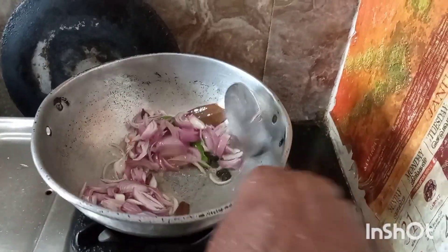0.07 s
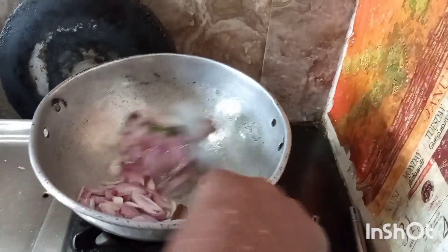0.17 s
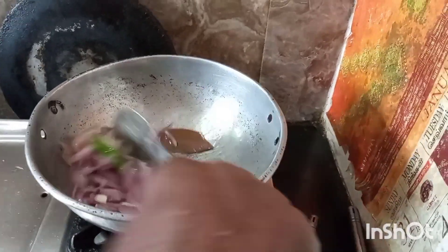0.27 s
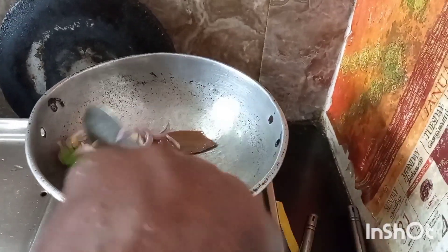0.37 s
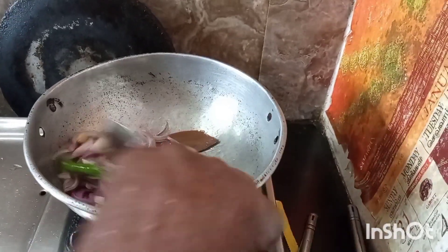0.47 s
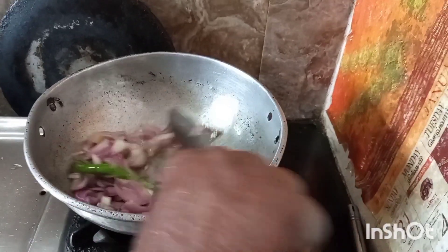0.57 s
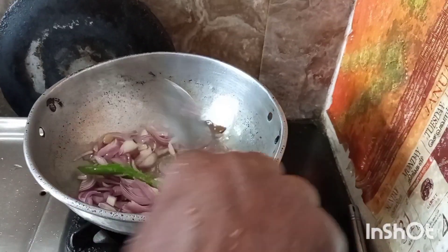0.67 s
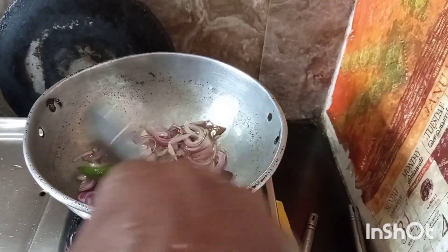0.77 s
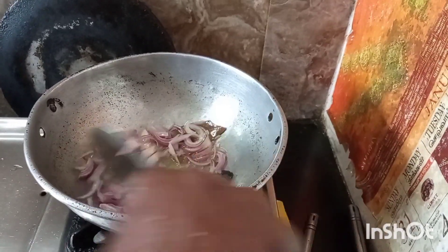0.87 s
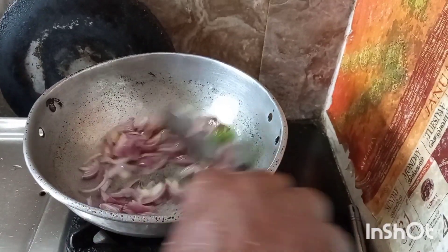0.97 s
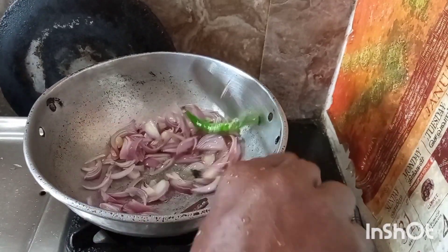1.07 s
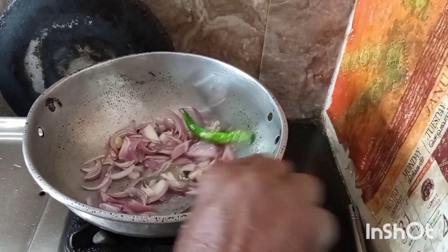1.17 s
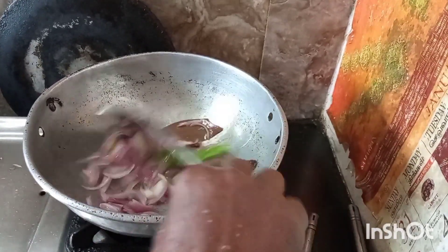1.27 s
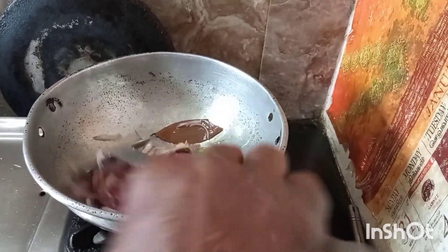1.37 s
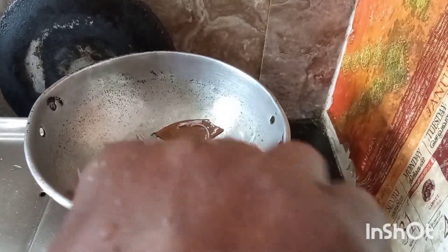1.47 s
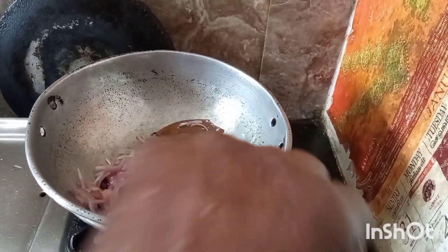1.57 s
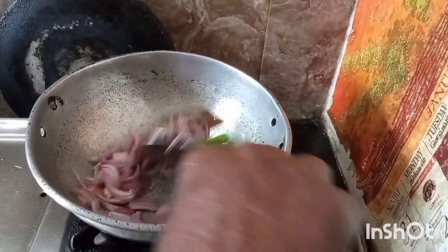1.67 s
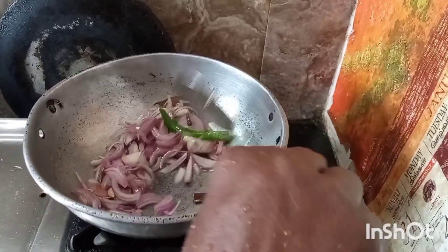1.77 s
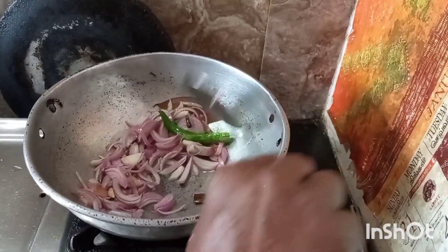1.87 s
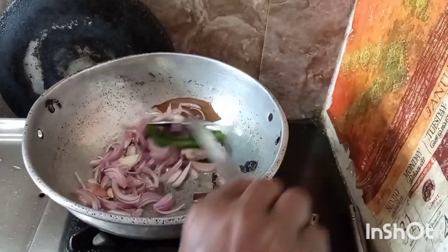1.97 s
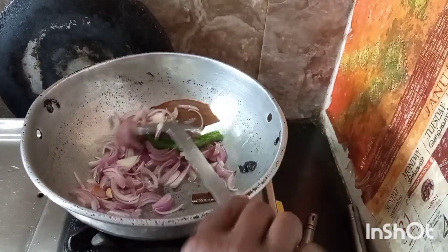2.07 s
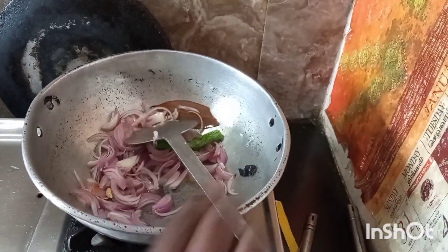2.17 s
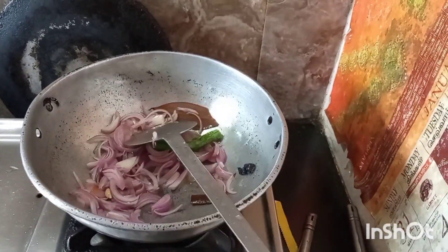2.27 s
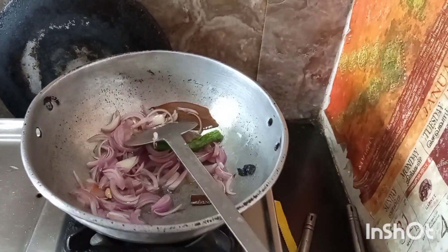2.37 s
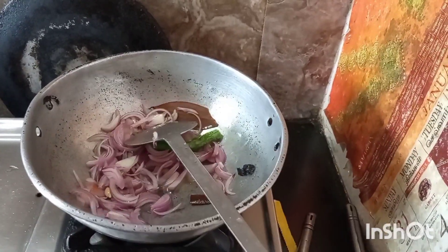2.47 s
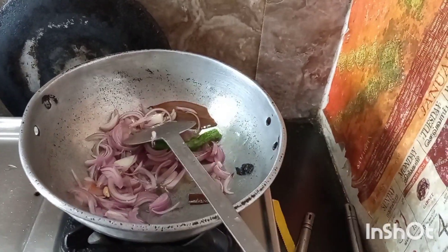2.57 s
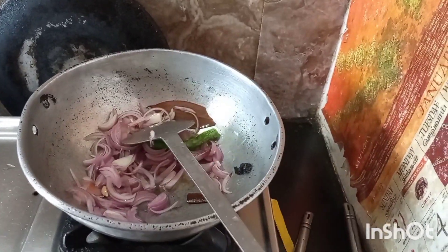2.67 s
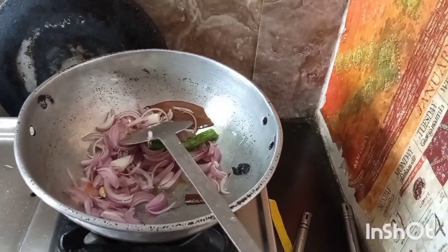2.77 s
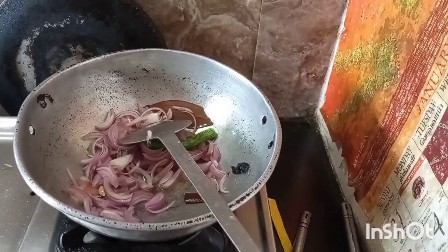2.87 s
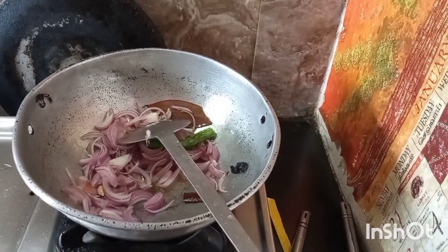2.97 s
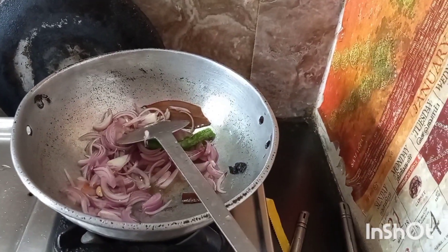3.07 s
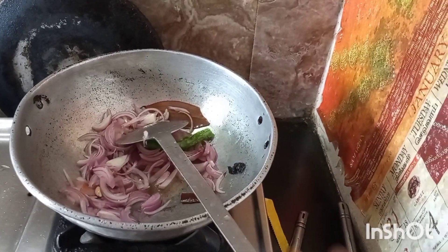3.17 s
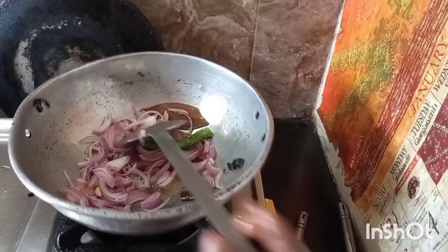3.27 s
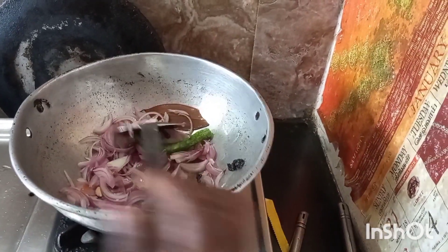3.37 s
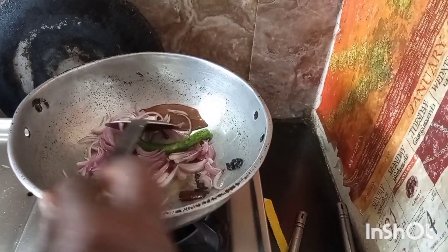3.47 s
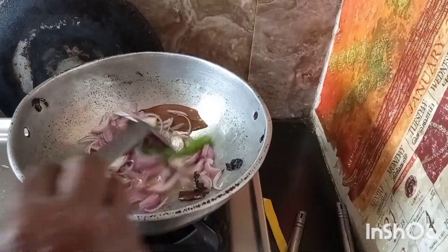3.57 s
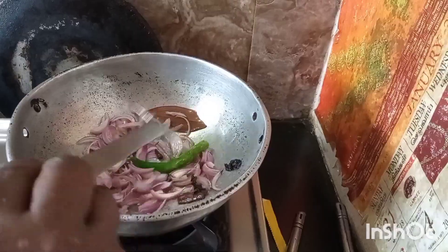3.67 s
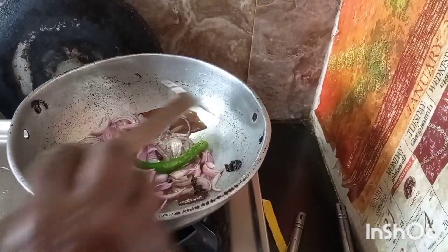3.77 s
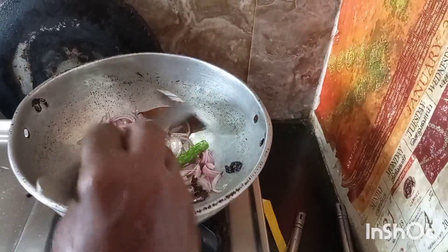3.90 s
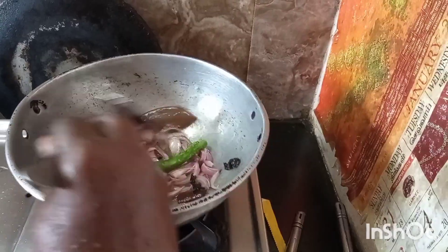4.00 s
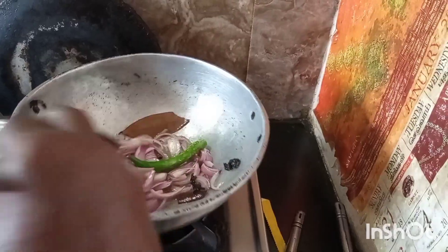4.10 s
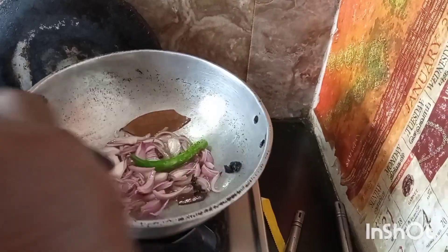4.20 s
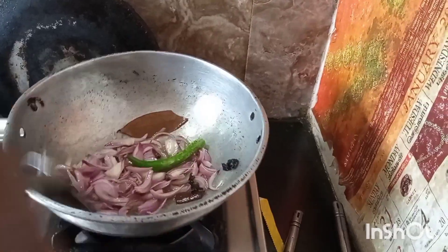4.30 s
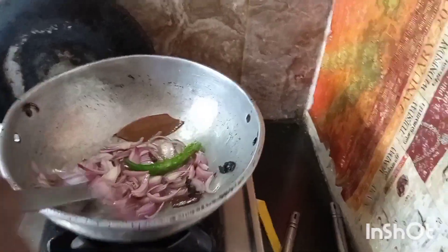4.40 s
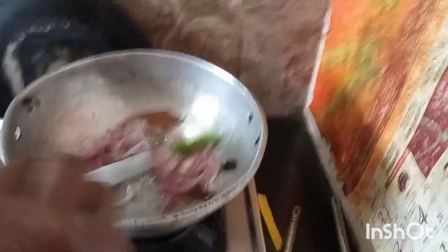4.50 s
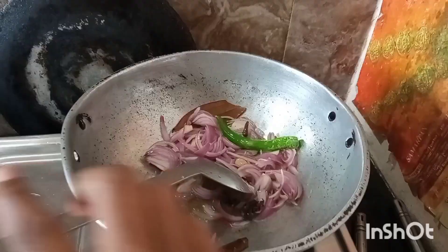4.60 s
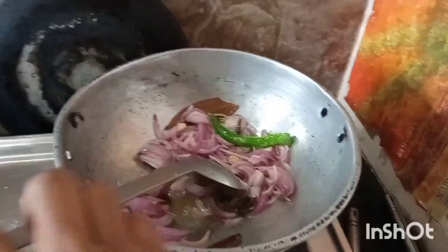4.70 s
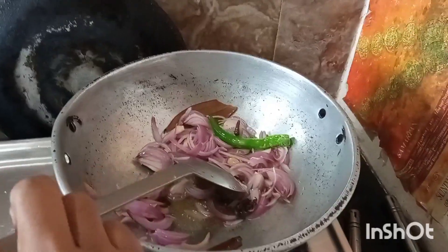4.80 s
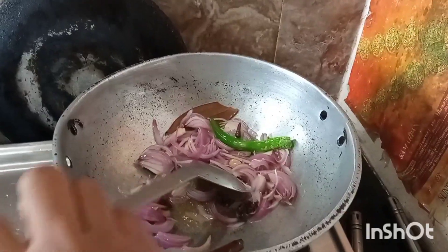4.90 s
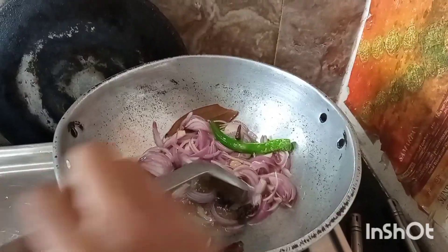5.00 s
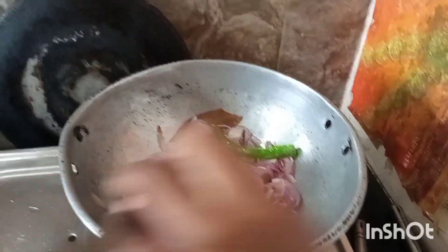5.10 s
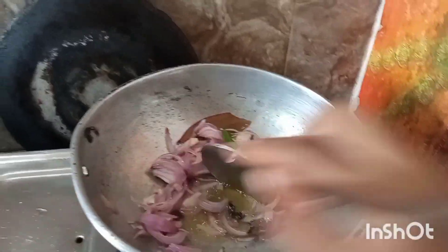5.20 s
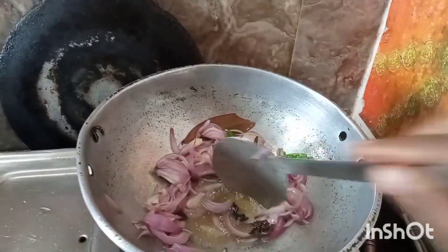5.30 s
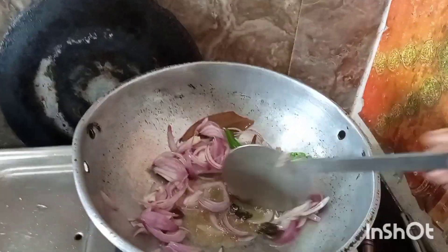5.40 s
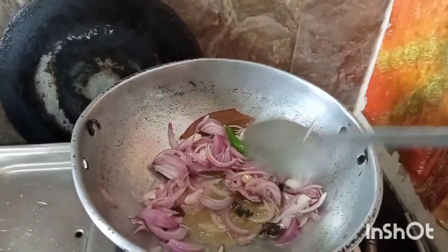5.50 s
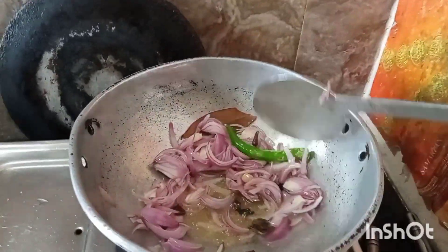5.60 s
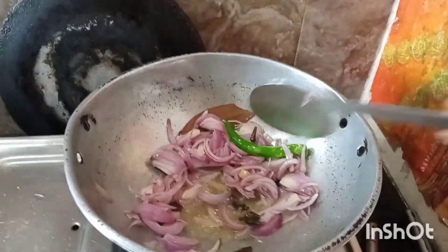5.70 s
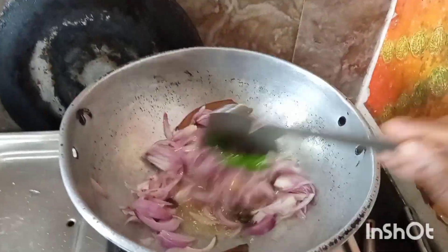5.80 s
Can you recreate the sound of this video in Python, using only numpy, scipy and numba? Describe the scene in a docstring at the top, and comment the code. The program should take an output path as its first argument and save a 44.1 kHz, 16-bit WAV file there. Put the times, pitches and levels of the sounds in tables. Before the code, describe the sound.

Sliced onions fry with a dense bright sizzle while a steel spatula knocks and scrapes a thin metal pan, with one brief cut near the end.

```python
"""Dense frying fizz runs throughout both passages, with steel knocking and scraping on a thin pan close by.
Sliced onions fry in oil: steam bubbles burst as filtered grains over hiss, the larger ones as lone pops.
A spatula's blows and stick-slip drive resonant modes of pan and blade; the pan rocks on the stove grate.
An edit joins two passages: the first stops, a short near-silence follows, then the second fades in."""
import sys
import numpy as np
from scipy import signal
from scipy.fft import rfft, irfft
from scipy.io import wavfile
from scipy.ndimage import uniform_filter1d
from numba import njit

SR = 44100
rng = np.random.default_rng(int(sys.argv[2]) if len(sys.argv) > 2 else 0)


def waveform_to_disk(signal):
    """Save audio, clipped to [-1, 1], as 16-bit WAV at the path in sys.argv[1]."""
    frames = np.transpose(np.atleast_2d(signal))
    scaled = np.clip(frames, -1, 1) * 32767
    samples = np.round(scaled).astype(np.int16)
    wavfile.write(sys.argv[1], SR, samples)


N = 257984

# fizz before the extra from stirring, one list for each passage: (time [s], level [dB])
FIZZ_LEVELS = [
    [(0, -30), (.69, -30.5), (1.08, -32), (1.52, -32), (2.3, -35.5), (2.86, -36), (3.3, -35.5), (3.8, -36),
     (4.0, -34), (4.3, -36), (4.51, -32.5)],
    [(4.86, -34.5), (5.1, -33), (5.4, -33.5), (5.85, -32)],
]
# mean spectrum of the fizz: (frequency [Hz], relative density [dB per Hz])
FIZZ_SPECTRUM = [(100, -36), (600, -19), (1200, -13), (2000, -8.5), (3500, -2.5), (5000, -3.5), (6500, -1),
                 (7300, -6.5), (8200, -12), (9700, -4.5), (11000, -13), (13800, -22.5), (14600, -14.5),
                 (15600, -8.5)]
# lone bubbles and spits of oil: (time [s], relative level [dB], pitch [Hz])
LONE_POPS = [(0.0296, -20.5, 6230), (0.061, -19.5, 6850), (0.1385, -26, 4150), (0.3475, -25, 3700),
             (0.4945, -22, 4050), (0.5878, -19, 6630), (0.8202, -25, 3400), (1.268, -28, 6000),
             (1.6483, -26, 4300), (2.2004, -21, 4200), (2.3377, -27, 3430), (2.4941, -23.5, 3640),
             (2.689, -26.5, 3700), (2.8385, -27, 4600), (2.8635, -27, 6750), (2.9634, -26, 4970),
             (3.0488, -30, 6220), (3.078, -23, 4930), (3.18, -26, 6200), (3.2682, -25, 3600),
             (3.387, -26, 5900), (3.522, -20.5, 6400), (3.6726, -22.5, 9000), (4.112, -23, 6640),
             (4.419, -19, 6400), (4.609, -25, 1650), (4.6688, -28, 2460), (4.789, -30, 6700),
             (4.9284, -21.5, 6200), (5.07, -26.5, 3600), (5.1244, -27, 6630), (5.251, -29, 3150),
             (5.126, -32, 1780), (5.3132, -25, 2250), (5.389, -25, 3650), (5.471, -25, 6170),
             (5.494, -21, 6900), (5.6193, -32, 3500), (5.6375, -22.5, 3640), (5.6997, -23, 3620)]
# spatula dragged over the metal, starting at once: (start [s], end [s], first relative level [dB],
# last relative level [dB], centre of the pan's ring [Hz], bare steel edge relative to the drag [dB])
SCRAPES = [(0, 0.078, -33.5, -31.5, 408, -14), (0.085, 0.25, -26, -53.5, 423, -9),
           (0.243, 0.33, -34.5, -28, 335, -9), (0.367, 0.45, -37, -44, 336, 0),
           (0.458, 0.563, -39.5, -38, 590, 3), (0.571, 0.719, -38.5, -48, 464, 0),
           (0.739, 1.055, -45, -52, 580, 6.5), (1.077, 1.316, -54, -53, 800, -6),
           (1.543, 1.64, -32, -35.5, 440, -27), (1.667, 1.758, -41, -49, 330, -12),
           (1.771, 1.894, -35, -31.5, 460, -8), (1.909, 2.062, -36.5, -36, 425, -4),
           (2.082, 2.133, -27.5, -37.5, 720, 3), (2.148, 2.198, -34.5, -38, 600, 2.5),
           (2.194, 2.262, -27, -33.5, 407, -2), (2.279, 2.347, -43, -49, 450, -2),
           (2.38, 2.46, -33, -44.5, 400, -0.5), (2.476, 2.704, -37, -54.5, 390, -2.5),
           (2.923, 3.004, -48.5, -58, 480, -15), (3.176, 3.28, -48, -73, 350, -4),
           (3.303, 3.395, -24.5, -42, 460, -8), (3.396, 3.518, -30, -40, 570, -7),
           (3.535, 3.751, -32.5, -53.5, 463, -26), (3.877, 3.993, -24.5, -37.5, 480, -8.5),
           (4.013, 4.147, -28.5, -38, 564, -25), (4.137, 4.215, -24.5, -41.5, 885, -7),
           (4.216, 4.325, -30, -41, 487, -15), (4.356, 4.412, -29.5, -29.5, 580, -2),
           (4.416, 4.533, -26.5, -21.5, 710, -16.5), (4.86, 5.044, -44, -58.5, 378, -24.5),
           (5.148, 5.284, -46.5, -40.5, 487, -3), (5.283, 5.426, -47, -50, 400, 10.5),
           (5.553, 5.637, -46.5, -59, 350, 6), (5.67, 5.785, -33, -35, 420, -12),
           (5.818, 5.852, -22.5, -36, 450, -19)]
# spatula knocks: (time [s], relative level [dB], centre of the pan's ring [Hz], relative crack level [dB])
SPATULA_KNOCKS = [(0.004, -28, 244, -38), (0.032, -28, 398, -30), (0.087, -26.5, 457, -37),
                  (0.26, -31.5, 236, -31), (0.322, -24, 318, -28), (0.463, -33, 455, -40),
                  (0.504, -26.5, 690, -29), (0.745, -52, 764, -26.5), (1.535, -31, 248, -30),
                  (1.567, -25.5, 340, -34), (1.778, -25, 216, -38), (1.839, -22.5, 740, -29),
                  (1.938, -36, 291, -41), (1.977, -32, 307, -42), (2.086, -29, 460, -48),
                  (2.198, -40, 500, -35), (2.224, -36, 314, -42), (2.362, -31.5, 680, -30.5),
                  (2.389, -28, 277, -45), (2.484, -42, 680, -37), (2.52, -38, 310, -33),
                  (3.234, -43, 727, -27), (3.291, -23, 216, -30), (3.336, -31, 264, -41),
                  (3.405, -23, 770, -26), (3.471, -25.5, 242, -41), (3.529, -25.5, 666, -40),
                  (3.599, -33, 696, -46), (3.869, -17, 312, -42), (3.896, -22.5, 710, -22),
                  (4.006, -27.5, 230, -45), (4.037, -25.5, 650, -45), (4.059, -25.5, 630, -33),
                  (4.138, -23, 1330, -22), (4.163, -51, 1350, -22.5), (4.351, -35, 315, -18),
                  (4.439, -23, 676, -30), (4.863, -38.5, 283, -26), (5.289, -35.5, 324, -31),
                  (5.365, -36.5, 275, -28), (5.415, -41, 283, -36), (5.673, -35, 280, -31),
                  (5.723, -24.5, 290, -35), (5.817, -32, 294, -44)]
# the pan bumps the grate and rocks on:
# (time [s], relative bump level [dB], relative rocking level [dB], centre of the ring [Hz])
GRATE_BUMPS = [(0.037, -44, -50, 130), (0.297, -38, -65, 120), (0.491, -62, -44, 181),
               (1.534, -43, -63, 140), (1.836, -43, -44.5, 121), (2.388, -44.5, -69, 130),
               (3.168, -34.5, -41, 127), (3.772, -34.5, -42, 140), (3.873, -40, -46, 120),
               (4.351, -52.5, -61, 119), (4.958, -38, -50, 111), (5.266, -59, -45.5, 162),
               (5.553, -36, -45, 147)]
# modes of the pan, damped by oil and onions: (frequency [Hz], relative level [dB], T60 [s])
PAN_MODES = [(209.3, -1.5, 0.1), (246, -3.5, 0.19), (283.6, 4, 0.097), (311, 2, 0.18), (415, -1, 0.14),
             (466.2, -1.5, 0.14), (503, -2.5, 0.16), (550, -11, 0.095), (675.4, 3, 0.095),
             (719.3, 1.5, 0.17), (783, -9, 0.088), (813, 2, 0.084), (901, -0.5, 0.075), (972, -2, 0.079),
             (1060, -8, 0.042), (1160, -1.5, 0.072), (1212, -8.5, 0.16), (1366, 4, 0.054),
             (1497, -6.5, 0.17), (1550, -23, 0.08)]
# modes of the spatula's steel blade: (frequency [Hz], relative level [dB], T60 [s])
BLADE_MODES = [(1955, 3, 0.059), (2112, -2, 0.097), (2303, 4, 0.061), (2410, -3, 0.051), (2650, 4.5, 0.059),
               (3180, -27, 0.05), (3248, 6, 0.077), (3640, 8.5, 0.029), (4040, 6, 0.022),
               (4460, 3.5, 0.077)]
# low modes of the stove grate: (frequency [Hz], relative level [dB], T60 [s])
GRATE_MODES = [(101, 0.5, 0.17), (118.7, 3.5, 0.53), (168.5, 5, 0.33), (230, 2, 0.051)]

CUT_S, RESUME_S, FADE_S = 4.517, 4.584, 0.24  # first passage stops, second begins, its fade-in time
MIC_LOW_HZ, TOP_HZ = 86.5, 15500  # band limits
ROCK_S, PUSH_S = 0.13, 0.069  # rocking dies away; the heavy pan follows the drag sluggishly
STIR_DB, STIR_S = 12, 0.0067  # stirring turns wet onion into the oil: extra fizz follows the drag


def undb(db):
    """Decibel law: level to amplitude ratio."""
    return 10 ** (np.asarray(db) / 20)


def unit(x):
    """Normalisation to an rms of 1."""
    return x / np.sqrt(np.mean(x ** 2))


def decay_after(times, db, tau_s):
    """Exponential relaxation: a level set at each moment dies away with time constant tau_s."""
    starts = np.zeros(N)
    starts[(times * SR).astype(int)] = undb(db)
    return signal.lfilter([1], [1, -np.exp(-1 / (tau_s * SR))], starts)


def lag(x, tau_s):
    """First-order inertia: a sluggish follower with gain 1 for steady input."""
    r = np.exp(-1 / (tau_s * SR))
    return signal.lfilter([1 - r], [1, -r], x)


def wander(rate):
    """Random fluctuation: levels drawn every 1 / rate s and joined by slopes; rms near 1."""
    hold = int(SR / rate)
    steps = np.repeat(rng.standard_normal(N // hold + 1), hold)
    return unit(uniform_filter1d(steps, hold)[:N])


def near_db(hz, centre_hz, octaves):
    """Modal coupling: modes far in pitch from the touched spot's centre are driven less."""
    return -3 * (np.log2(hz / centre_hz) / octaves) ** 2


def ring(force, hz, t60):
    """Damped resonance without bass radiation: a unit impulse rings at amplitude 1, never past the edit."""
    r, w = np.exp(-np.log(1000) / (t60 * SR)), 2 * np.pi * hz / SR
    passages = np.split(force, [int(RESUME_S * SR)])
    recursion = [1, -2 * r * np.cos(w), r * r]
    return np.hstack([signal.lfilter([.5, 0, -.5], recursion, part) for part in passages])


def slips(rate, scatter_db):
    """Stick-slip friction: clicks at uneven moments, mostly small, a few large; rms 1."""
    happens = rng.random(N) < rate / SR
    size = undb(scatter_db * np.minimum(rng.exponential(size=N), 4))
    return unit(happens * rng.standard_normal(N) * size)


def strokes():
    """Friction drive: drag on the pan, the pan's centre pitch and drag on the bare edge, by sample."""
    drag, edge, pan_hz = np.zeros(N), np.zeros(N), np.full(N, 500.)
    for start, end, first_db, last_db, hz, edge_db in SCRAPES:
        a, b = int(start * SR), min(int(end * SR), N)
        drag[a:b] = undb(np.linspace(first_db, last_db, b - a))
        edge[a:b] = drag[a:b] * undb(edge_db)
        pan_hz[a:b] = hz
    return drag, pan_hz, edge


def fizz_amplitude():
    """Piecewise-linear level history of the fizz in each passage, as amplitude by sample."""
    t = np.arange(N) / SR
    first, second = (np.interp(t, *np.transpose(rows)) for rows in FIZZ_LEVELS)
    return undb(np.where(t < RESUME_S, first, second))


@njit
def bubbles(at, hz, cycles, size, count):
    """Bubble resonance: each swells for an instant to its size and rings out in a few cycles."""
    out = np.zeros(count + 4096)
    for k in range(len(at)):
        step = hz[k] / SR / cycles[k]
        turn = np.exp(2j * np.pi * hz[k] / SR - step)
        z = size[k] * np.e * step + 0j
        for i in range(min(4096, int(8 / step))):
            out[at[k] + i] += i * z.imag  # i makes the swell, the shrinking z the decay
            z *= turn
    return out[:count]


def colour(x, points):
    """Minimum-phase filtering: brings the mean spectrum of x to the (Hz, dB) points, causally."""
    hz, power = signal.welch(x, SR, nperseg=512)
    point_hz, point_db = np.transpose(points)
    target_db = np.interp(np.log(hz + 1), np.log(point_hz), point_db)
    log_gain = target_db * np.log(10) / 20 - np.log(power) / 2
    # folding the cepstrum onto positive times makes the filter causal
    cepstrum = irfft(log_gain)
    cepstrum[1:256] *= 2
    cepstrum[257:] = 0
    impulse = irfft(np.exp(rfft(cepstrum)))
    return signal.fftconvolve(x, impulse)[:N]


def kitchen(db=-77, hz=60):
    """Low-pass noise: faint low rumble of the room and the flame."""
    rumble = signal.lfilter(*signal.butter(1, hz, fs=SR), rng.standard_normal(N))
    return undb(db) * unit(rumble)


def grate(drag, bump_db=-38, bump_s=0.00052, rock_db=-38, push_db=-55, octaves=0.35):
    """Structure-borne excitation: bumps and shaking through the pan's feet drive low modes of the stove."""
    s, db, after_db, centre_hz = np.transpose(GRATE_BUMPS)
    push = undb(push_db) * lag(drag, PUSH_S)
    cut = int(RESUME_S * SR)
    out = 0
    for hz, mode_db, t60 in GRATE_MODES:
        spot_db = near_db(hz, centre_hz, octaves)
        rocking = decay_after(s, after_db + rock_db + spot_db, ROCK_S) + push
        # the edit ends all rocking: take away what would decay on past it
        rocking[cut:] -= rocking[cut] * np.exp(-np.arange(N - cut) / (ROCK_S * SR))
        bump = decay_after(s, db + bump_db + spot_db, bump_s)
        force = bump + np.maximum(rocking, 0) * slips(1000, 4.0)
        out = out + undb(mode_db) * ring(force, hz, t60)
    return out


def pan(drag, drag_hz, octaves=1.0, drag_octaves=1.0, knock_db=-11, chatter_db=-24, chatter_s=0.0059,
        drag_db=-46, frying_db=-70, shift_db=3.5):
    """Modal excitation: blows with some ms of chatter, uneven rubbing and faint shaking by the frying."""
    s, db, centre_hz, _ = np.transpose(SPATULA_KNOCKS)
    sides = np.sign(rng.standard_normal((len(s), len(PAN_MODES)))).T  # each spot pushes a mode in or out
    frying = fizz_amplitude() * undb(frying_db)
    out = 0
    for (hz, mode_db, t60), side in zip(PAN_MODES, sides):
        blow_db = db + knock_db + near_db(hz, centre_hz, octaves)
        rub_db = drag_db + near_db(hz, drag_hz, drag_octaves) + shift_db * wander(25)
        rubbing = drag * undb(rub_db) / np.sqrt(t60)
        chatter = decay_after(s, blow_db + chatter_db, chatter_s)
        force = (chatter + frying) * rng.standard_normal(N) + rubbing * slips(1500, 4.5)
        force[(s * SR).astype(int)] += side * undb(blow_db)
        out = out + undb(mode_db) * ring(force, hz, t60)
    return out


def blade(edge, crack_db=-4, ring_db=-39, rasp_db=-2, shift_db=3.5, low_hz=1000, top_hz=7500):
    """Impact and friction: the edge cracks or chatters; its modes come and go as contact slides, over rasp."""
    s, _, _, db = np.transpose(SPATULA_KNOCKS)
    crack = decay_after(s, db + crack_db, .005) + decay_after(s, db + crack_db + 5, .001)
    force = edge * slips(4000, 3.9) + crack * rng.standard_normal(N)
    rasp = signal.sosfilt(signal.butter(2, [low_hz, top_hz], "band", fs=SR, output="sos"), force)
    out = undb(rasp_db) * rasp
    for hz, mode_db, t60 in BLADE_MODES:
        contact = undb(mode_db + ring_db + shift_db * wander(20))
        out = out + ring(force * contact, hz, t60)
    return out


def pops(gain_db=5.0, tail_db=-12, tail_s=0.0086, late_s=0.00091):
    """Bubble resonance: larger bubbles give a short ring, with a little decaying spray."""
    s, db, hz = np.transpose(LONE_POPS)
    start_s = s + late_s
    cycles = np.full(len(s), 1.3)
    hiss = unit(colour(rng.standard_normal(N), FIZZ_SPECTRUM))
    spray = decay_after(start_s, db + tail_db, tail_s) * hiss
    return bubbles((start_s * SR).astype(np.int64), hz, cycles, undb(db + gain_db), N) + spray


def fizz(drag, rate=2500, scatter_db=5.0, biggest_db=15, cycles=0.91, hiss_db=5.5,
         spurt_rate=45, spurt_db=-6, spurt_s=0.0071):
    """Random superposition: small bubbles, rate a second, over hiss of those too small to part, in spurts."""
    when, pitch, chance, length = rng.random((int(rate * N / SR), 4)).T
    hz = 1500 * 2 ** (3.45 * pitch)
    size = undb(np.minimum(-scatter_db * np.log(chance), biggest_db)) * hz ** 0.75
    grains = bubbles((when * N).astype(np.int64), hz, cycles * (.5 + length), size, N)
    mix = unit(grains) + undb(hiss_db) * rng.standard_normal(N)
    # sudden spurts die away over a steady part
    spurt_when, spurt_size = rng.random((int(spurt_rate * N / SR), 2)).T
    spurts = 1.5 + decay_after(spurt_when * N / SR, spurt_db + 12 * (spurt_size - .5), spurt_s)
    stirring = 1 + undb(STIR_DB) * lag(drag, STIR_S)
    return unit(colour(mix, FIZZ_SPECTRUM) * spurts) * fizz_amplitude() * stirring


def scene():
    """Linear superposition at one microphone, deaf to the near sources' deepest bass."""
    drag, drag_hz, edge = strokes()
    near = grate(drag) + pan(drag, drag_hz) + blade(edge) + pops() + fizz(drag)
    bass_cut = signal.butter(3, MIC_LOW_HZ, "high", fs=SR, output="sos")
    mono = kitchen() + signal.sosfilt(bass_cut, near)
    return np.array([mono, mono])


def record(dry):
    """Gating and band-limiting: a stop within a few ms with a tiny tail, a fade-in, and a cut top."""
    t = np.arange(N) / SR
    gone = np.maximum(t - CUT_S, 0)
    stop = np.maximum(undb(-12000 * gone), undb(-27 - 1500 * gone))  # slopes in dB per s
    rise = np.clip(0.098 + (t - RESUME_S) / FADE_S, 0, 1) ** 1.11
    edit = np.where(t < RESUME_S, stop, rise)
    top_cut = signal.ellip(10, .2, 75, TOP_HZ, fs=SR, output="sos")
    return signal.sosfilt(top_cut, dry * edit)


dry = scene()
out = record(dry)
waveform_to_disk(out)
```